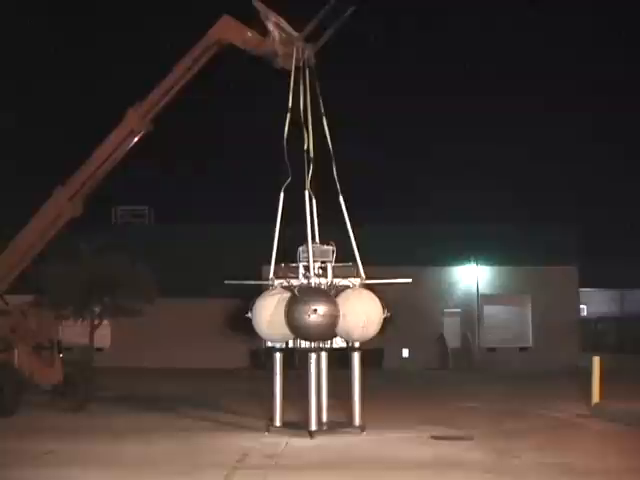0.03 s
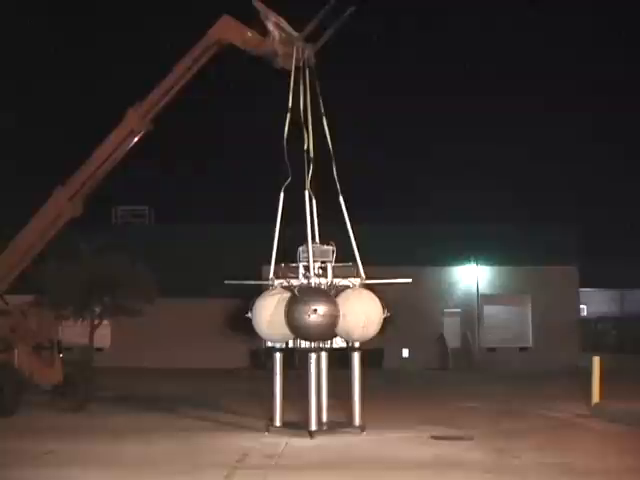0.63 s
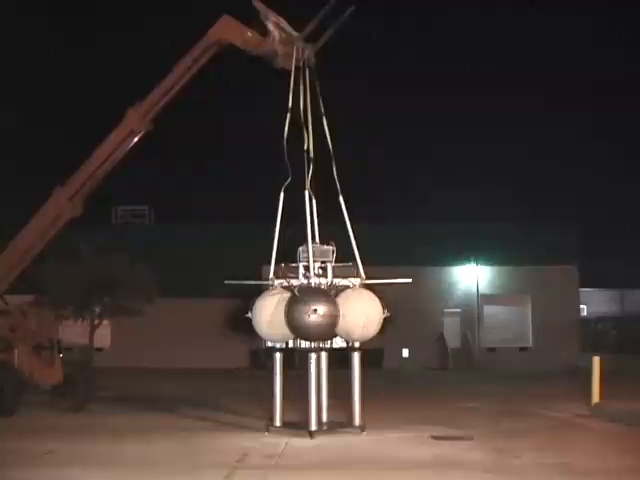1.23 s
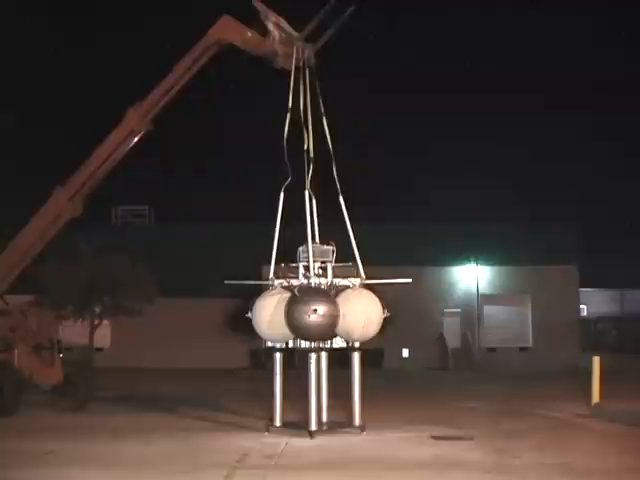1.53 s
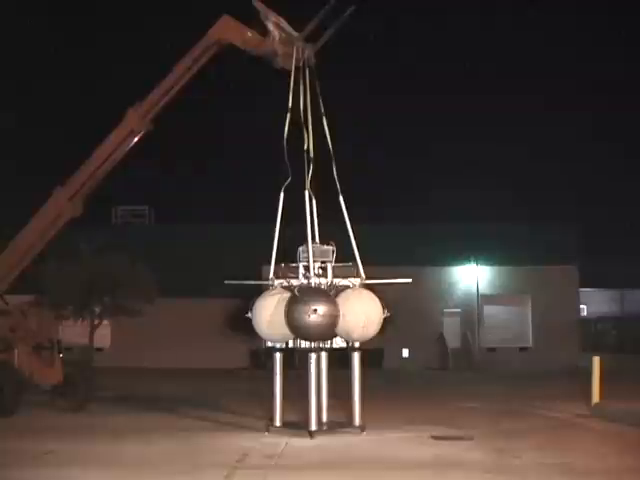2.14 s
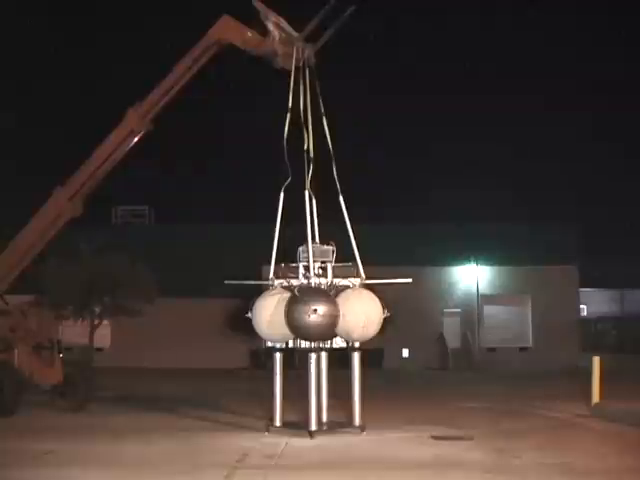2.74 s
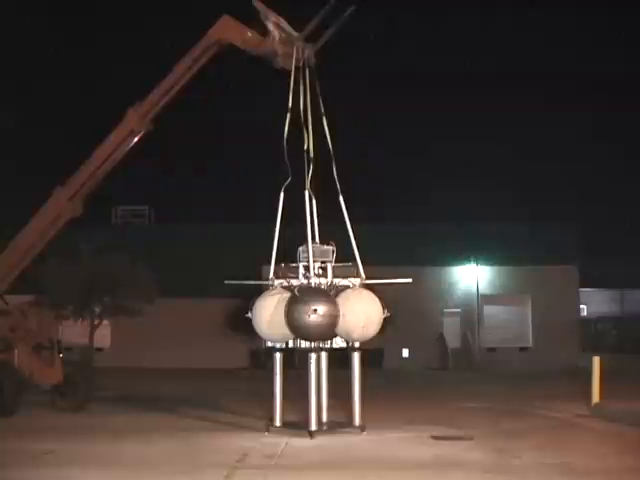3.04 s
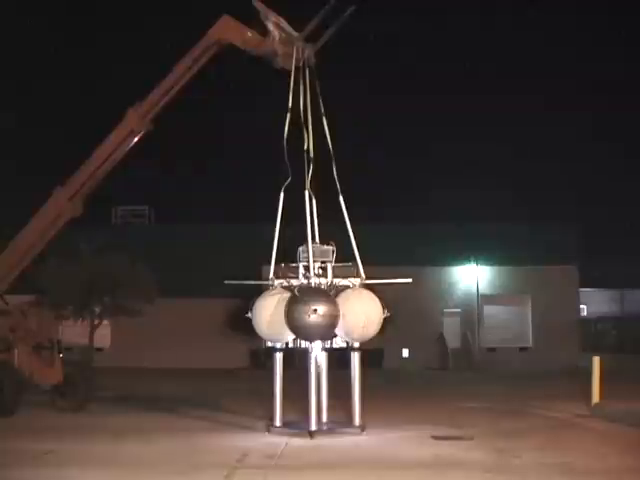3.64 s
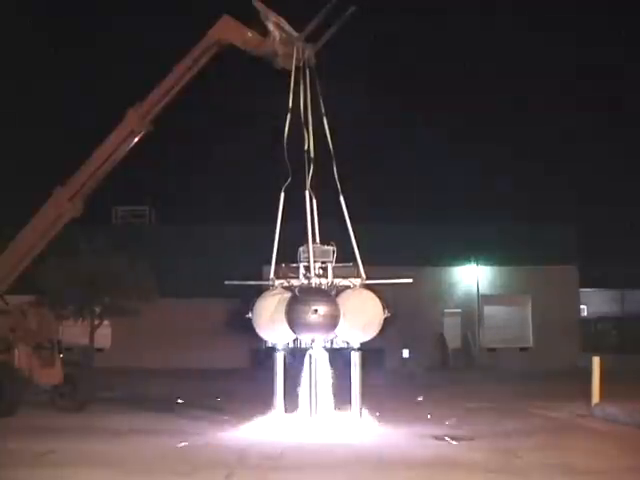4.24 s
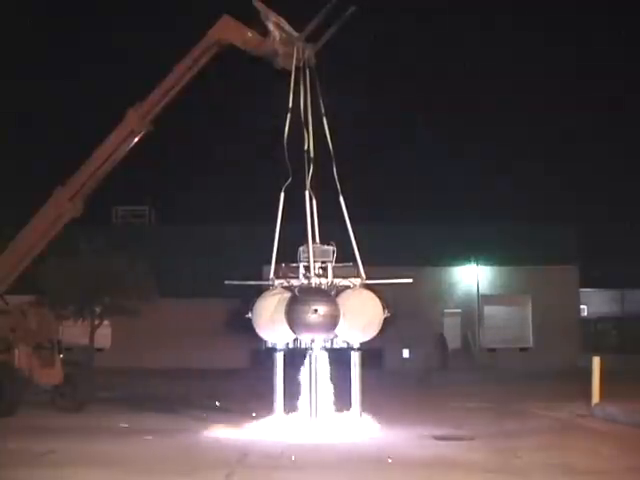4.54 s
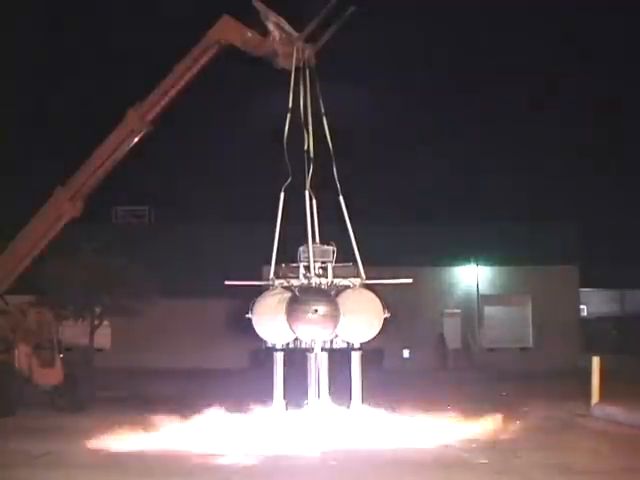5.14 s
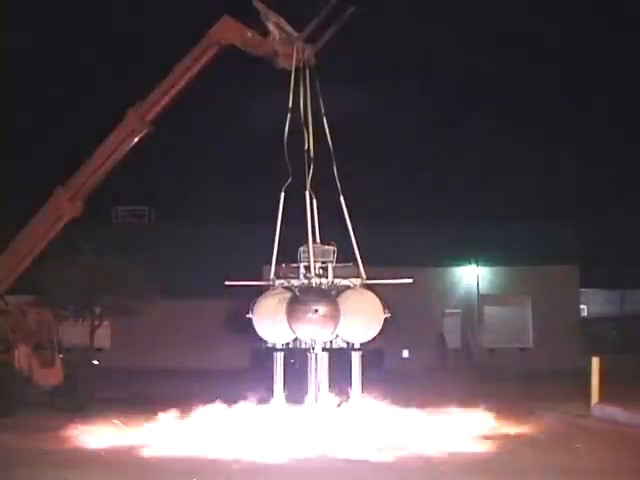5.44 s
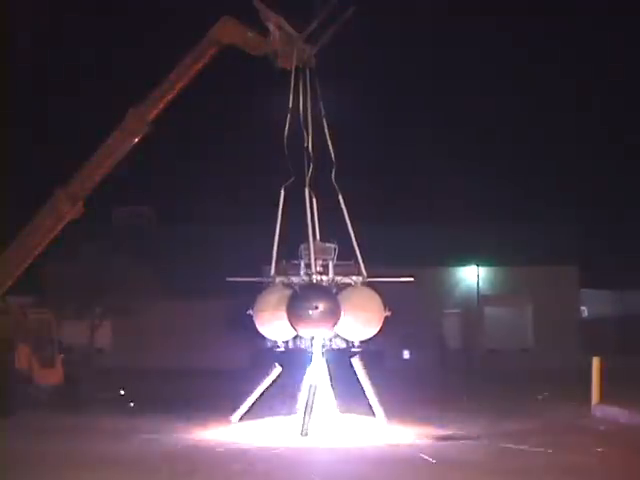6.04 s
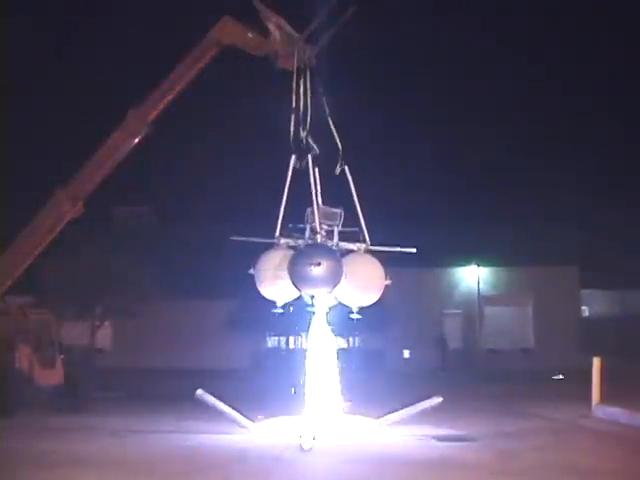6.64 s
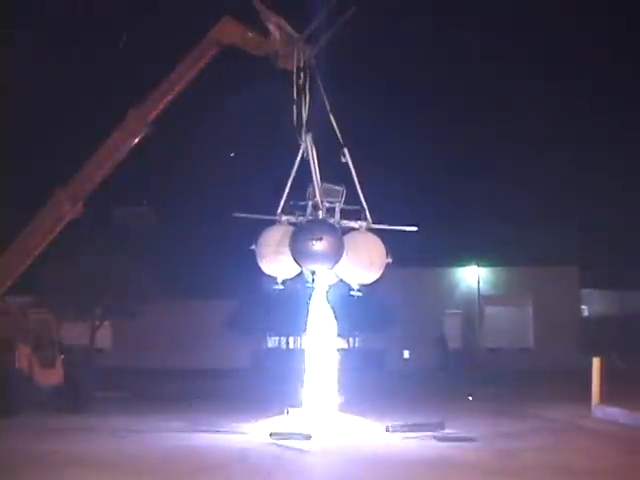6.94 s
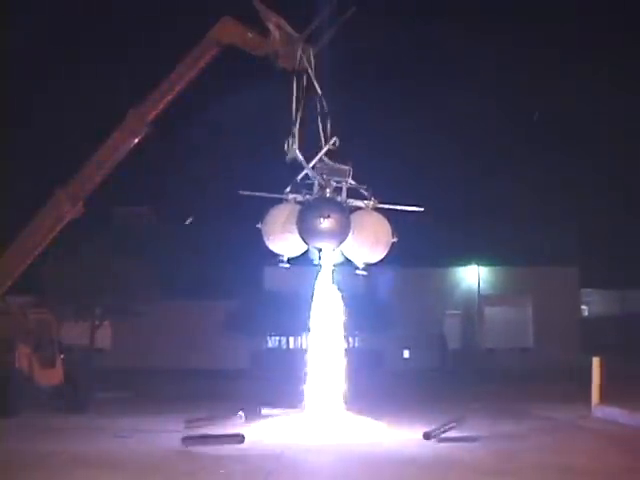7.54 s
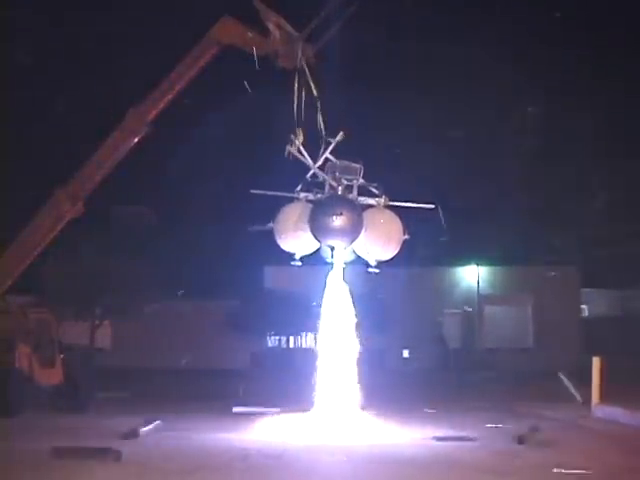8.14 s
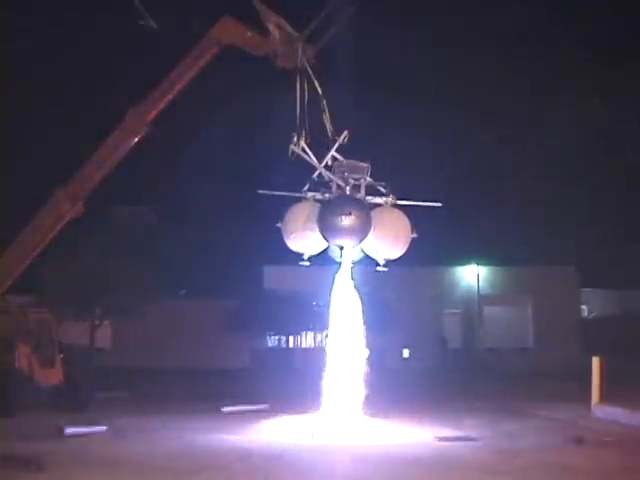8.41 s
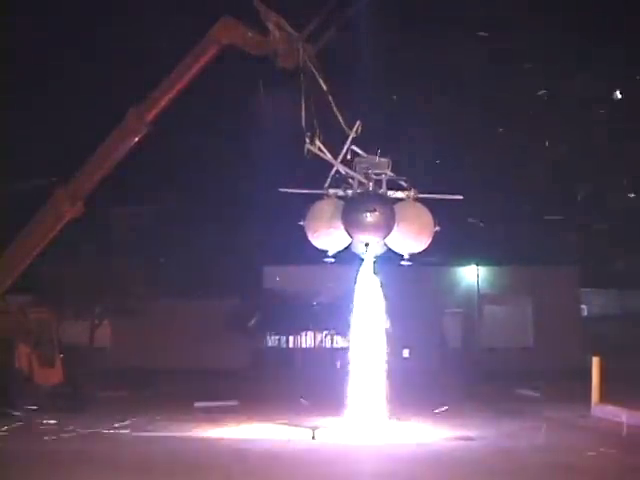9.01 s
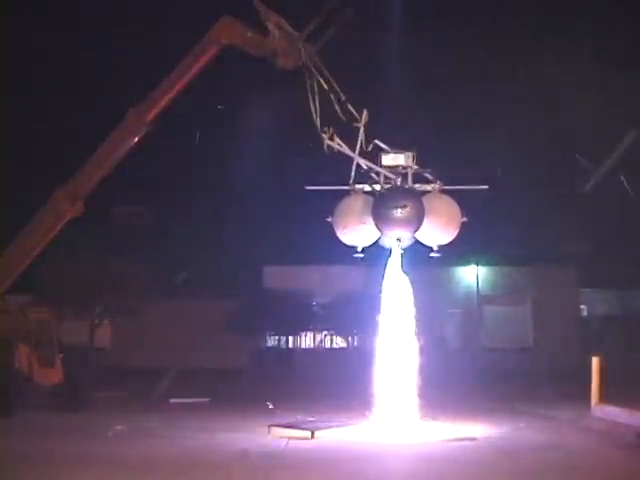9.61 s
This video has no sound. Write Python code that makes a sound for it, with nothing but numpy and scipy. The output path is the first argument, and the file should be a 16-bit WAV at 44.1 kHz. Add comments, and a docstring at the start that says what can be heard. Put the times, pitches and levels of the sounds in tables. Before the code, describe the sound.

A small rocket engine starts with a sharp blast and hiss, howls, pops, then roars at full thrust with brief screeches outdoors.

```python
"""First comes the faint hum of distant machinery in a paved yard at night. Then the igniter of a
tethered rocket lander cracks on and hisses, blowing gas through the hollow engine chamber. The chamber
lights with a howl that rises as its gas heats up. The flame pops, sputters, and opens into a full roar
of swirling exhaust as the craft lifts off, screeching where the jet hits the ground.
A wall sends the sound back, and the roar overloads the microphone."""
import sys
import numpy as np
from scipy import signal
from scipy.fft import rfft, irfft, next_fast_len
from scipy.io import wavfile
from scipy.ndimage import uniform_filter1d, map_coordinates

SR = 44100
rng = np.random.default_rng(int(sys.argv[2]) if len(sys.argv) > 2 else 0)


def dump_mix(stems):
    """Bounce the given channels to the path in sys.argv[1] as a 16-bit WAV at rate SR."""
    frames = np.atleast_2d(stems).T  # one column per channel
    limited = np.clip(frames, -1, 1)  # hard clip at full scale
    pcm = np.round(limited * 32767).astype(np.int16)
    wavfile.write(sys.argv[1], SR, pcm)


N = 435266

# the torch lights, the fuel valves open, the jet passes the speed of sound
TORCH_ON_S, VALVES_OPEN_S, SUPERSONIC_S = 2.697, 3.45, 3.96

# engine strength as it lights, sputters, almost dies and opens fully: t/s, level/dB
THRUST = [(3.45, -20), (3.62, -16), (3.9, -8), (4.03, -4), (4.3, -6), (4.6, -11.5), (4.74, -16.5),
          (4.9, -16.5), (4.99, -13.5), (5.3, -10.5), (5.59, -13), (5.685, -25), (5.75, -5.5), (5.98, -6),
          (6.25, -3.5), (8.6, -3), (8.95, -5.5), (9.4, -2.5)]
# the deep part of the roar, relative to the thrust: t/s, level/dB
PLUME_LEVEL = [(3.55, -11), (3.92, -5), (4.2, -14), (4.8, -7), (5.5, -23), (6.1, -13), (6.8, -6),
               (7.78, -4), (7.95, -12.5), (8.7, -7.5), (9.86, -8)]
# rises and dips of the highest treble: t/s, level/dB
TREBLE_LEVEL = [(4.1, 2.5), (4.7, 0), (4.98, 5), (5.25, 1), (5.88, -0.5), (6.05, 3), (6.55, -10.5),
                (6.8, 0.5), (7.55, -5.5), (8.02, 2.5), (8.2, -6), (8.5, 4.5), (8.85, -2), (9.2, 3.5),
                (9.55, -3), (9.75, 2.5)]
# flame rumble, strongest while burning fuel spreads over the ground: t/s, level/dB
RUMBLE_LEVEL = [(3.45, -27), (3.9, -29), (4.05, -18), (4.3, -21.5), (4.88, -28.5), (5.02, -17.5),
                (5.3, -22.5), (5.8, -27.5), (6.0, -33), (6.6, -24), (8.4, -26), (9.86, -22)]
# screeches of the jet on the ground: t/s, length/s, centre f/Hz, level/dB
SCREECHES = [(3.457, .05, 1300, -13), (3.656, 0.0906, 1200, -15.5), (3.99, .11, 1330, -12),
             (4.15, .07, 1600, -7), (4.252, .13, 1850, -12), (5.71, 0.048, 1150, -19),
             (6.299, .17, 1200, -11.5), (6.75, .4, 950, -15.5), (8.72, 0.068, 1800, -13),
             (9.77, 0.062, 1900, -8)]
# spurts of purge gas, which flushes the engine: t/s, length/s, level/dB
SPURTS = [(2.865, .17, -18), (3.34, .12, -19)]
# howls as the torch, then the main flame, lights: t/s, length/s, level/dB, rise/s, time to half hot/s
HOWLS = [(2.697, .12, -20, .004, 0.104), (3.729, 0.236, -8.5, 0.064, .15)]
# thumps and pops of uneven burning: t/s, level/dB, f/Hz, time to fade by 60 dB/s
THUMPS = [(2.697, -17, 100, 0.14), (3.455, -23, 60, .2), (4.774, -8, 114, 0.14), (4.99, -12, 173, 0.42),
          (5.235, -16, 153, .15), (5.711, -13, 120, .15), (5.745, 2.5, 1007, 0.13)]
# the echo weakens as the craft climbs: t/s, echo boost/dB, left minus right level/dB
ECHO_AND_PAN = [(2.7, 10.5, 0), (4.2, 9, -0.8), (5.0, 4, -2), (5.8, 3.5, -1.5), (6.5, 3.5, -0.5),
                (9.86, 3, -.3)]

# the tone colour (spectrum) of each noise: f/Hz, relative level/dB
ROAR_COLOUR = [(60, -36), (200, -20), (310, -16.5), (420, -11.5), (600, -6.5), (800, -7), (1200, 0.5),
               (1700, -0.5), (2250, 0.5), (2800, -6), (4000, -10), (8000, -33.5)]
PLUME_COLOUR = [(60, -19), (200, -8.5), (310, -1), (420, -2.5), (600, 0), (760, 2.5), (1000, 2.5),
                (1500, -14), (3000, -49)]
HISS_COLOUR = [(1500, -22), (2600, -3.5), (3600, -1.5), (5200, -2.5), (7000, -6), (9000, -14.5),
               (12000, -32), (16000, -38)]
FIZZ_COLOUR = [(4000, -18), (7000, 1.5), (9000, 3), (12000, 0.5), (16000, -4)]
RUMBLE_COLOUR = [(15, -8), (30, 1.5), (65, 1), (110, -2.5), (175, 4), (230, -6), (310, -4.5), (450, -6.5),
                 (900, -35)]
BLAST_COLOUR = [(60, -3), (200, -8), (380, -13), (620, 2.5), (800, -2.5), (1250, 4.5), (1750, -6),
                (2200, 1), (2800, -11), (4800, 1), (8000, -2.5), (16000, -28)]
TORCH_COLOUR = [(90, -21), (300, -9), (540, -9), (760, -9.5), (1020, -1), (1330, -6), (1640, -8.5),
                (1900, -0.5), (2700, -1), (3600, 0.5), (5200, -3), (7000, -4.5), (11000, -13.5),
                (16000, -22)]
PURGE_COLOUR = [(4000, -17), (7000, -2.5), (9000, 0.5), (10500, -1), (12500, 1.5), (14500, -5), (16000, -1)]
BOOM_COLOUR = [(30, -18), (85, -14), (125, -7.5), (190, 6), (240, -1.5), (320, -11.5), (390, -18),
               (700, -40)]
YARD_COLOUR = [(12, -48), (20, -18), (44, -3), (64, -1.5), (85, -15.5), (166, -2.5), (191, -8), (281, -13),
               (404, -15.5), (630, -17), (833, -20.5), (5230, -38.5), (6010, -37.5), (14200, -48),
               (15500, -35)]
FLAT_COLOUR = [(20, 0), (20000, 0)]

# ringing notes of the chamber, the machinery and the torch: f/Hz, width/Hz, relative level/dB
CHAMBER_NOTES = [(300, 64, -1.5), (1046, 86, -3.5), (1940, 70, -17), (3010, 60, -12), (3600, 220, -6),
                 (4440, 150, -7), (5620, 180, -9), (6850, 130, -16)]
HUM_NOTES = [(30, 14, -1), (57, 14, -3), (115, 12, -4), (167, 9, -5), (644, 16, -9), (5300, 270, -28)]
SPIT_NOTES = [(4650, 400, 0), (5400, 400, 0)]
# thin electronic whines: f/Hz, level/dB
WHINES = [(8242, -78), (15735, -73)]
# the wall's dull echo, before its boost: f/Hz, gain
WALL_GAIN = [(100, 0.12), (600, 0.19), (1600, 0.14), (3000, 0.1), (8000, .01)]
# how alike the left and right channels are: f/Hz, likeness from 0 to 1
JET_ALIKE = [(30, 0.85), (130, 0.99), (640, 1), (1400, 0.96), (3100, 0.82), (7500, 0.39), (12000, 0.47),
             (15000, 0.64)]
YARD_ALIKE = [(60, 0.74), (130, 1), (290, 0.7), (640, 0.67), (1410, 0.38), (3100, 0.27), (7000, 0.23),
              (15000, 0.48)]


def jet():
    """Swirls in the exhaust follow the thrust: small ones hiss at the nozzle, big ones roar beyond it."""
    thrust_db, plume_db = curves(THRUST) + curves(PLUME_LEVEL)
    treble_db, rumble_db = curves(TREBLE_LEVEL) + curves(RUMBLE_LEVEL)
    burning = envelope(VALVES_OPEN_S, np.inf, attack_s=.012, release_s=1)
    flutter = amp(0.59 * wobble(16) + 0.73 * wobble(90))
    roar = amp(thrust_db - 1.04) * rush(ROAR_COLOUR, JET_ALIKE, patchy_db=1.8)
    plume = amp(thrust_db + plume_db) * rush(PLUME_COLOUR, JET_ALIKE, patchy_db=1.6)
    hiss = amp(0.9 * thrust_db + .15 * treble_db - 3) * rush(HISS_COLOUR, JET_ALIKE, patchy_db=1.44)
    fizz = amp(thrust_db + treble_db - 11) * rush(FIZZ_COLOUR, JET_ALIKE, patchy_db=1.5)
    rumble = amp(rumble_db) * rush(RUMBLE_COLOUR, JET_ALIKE, patchy_db=1.9)
    # the treble is weak until the jet is supersonic, and when the nozzle nearly stalls (below -17 dB)
    starting_db = -7 * np.clip((SUPERSONIC_S - clock()) / .05 + 1, 0, 1)
    stalling_db = 0.69 * np.minimum(thrust_db + 17, 0)
    treble = amp(starting_db + stalling_db) * (hiss + fizz)
    return burning * (flutter * (roar + plume + treble) + rumble)


def screech():
    """The jet hitting the ground feeds back on itself in rough bursts, with a pitch that hops about."""
    centre_hz, = curves([(t, hz) for s, length, hz, db in SCREECHES for t in (s, s + length)])
    bursts = sum(amp(db) * envelope(s, length, attack_s=0.014, release_s=0.034)
                 for s, length, hz, db in SCREECHES)
    core = amp(2 * wobble(40)) * fuzzy_tone(centre_hz * (1 + .07 * wobble(28)), width_hz=80)
    tearing = fuzzy_tone(centre_hz, width_hz=560) + amp(-5) * core
    return bursts * amp(wobble(50)) * tearing


def igniter():
    """The torch starts with a blast, then hisses; purge gas sizzles and fades once the valves open."""
    age = clock() - TORCH_ON_S
    strike = lambda db, fade_s: amp(db - 60 * np.abs(age) / fade_s) * (age > 0)
    unsteady = lambda: amp(.6 * wobble(19) + .6 * wobble(83))
    blast = strike(db=-8, fade_s=1.0) * rush(BLAST_COLOUR, JET_ALIKE, patchy_db=4.0)
    spit = strike(db=-7, fade_s=.11) * ringing(SPIT_NOTES, JET_ALIKE)
    torch = amp(-16.5) * torch_flow() * unsteady() * rush(TORCH_COLOUR, JET_ALIKE, patchy_db=2.0)
    purge = amp(-17.5) * envelope(TORCH_ON_S, VALVES_OPEN_S - TORCH_ON_S, attack_s=.003, release_s=0.24)
    spurts = sum(amp(db) * envelope(s, length, attack_s=0.032, release_s=0.033)
                 for s, length, db in SPURTS)
    sizzle = (purge + spurts) * unsteady() * rush(PURGE_COLOUR, JET_ALIKE, patchy_db=2.5)
    return blast + spit + torch + sizzle


def torch_flow():
    """The torch's gas snaps on, holds, and fades as the main flame takes over."""
    return envelope(TORCH_ON_S, length_s=1.07, attack_s=.003, release_s=0.17)


def chamber():
    """The hollow chamber booms and rings as the torch fills it, and howls each time its gas heats up."""
    filling = np.clip((clock() - 2.8) / 0.22, 0, 1)
    falter_db = -8 * np.exp(-((clock() - 3.42) / 0.031) ** 2)  # a dip just before the valves open
    boom = amp(-21.5) * rush(BOOM_COLOUR, JET_ALIKE, patchy_db=1.5)
    ring = filling * amp(-18.5) * ringing(CHAMBER_NOTES, JET_ALIKE)
    return torch_flow() * amp(falter_db) * (boom + ring) + sum(howl(*row) for row in HOWLS)


def howl(start_s, length_s, db, attack_s, heating_s):
    """The chamber's lowest note swells into a rough growl and climbs as the gas heats."""
    cold_hz, hot_hz = 102.7, 189.7
    heat = (1 + np.tanh((clock() - start_s) / heating_s - 1)) / 2
    pitch_hz = cold_hz + (hot_hz - cold_hz) * heat
    size = amp(db) * envelope(start_s, length_s, attack_s, release_s=0.053)
    phase = 2 * np.pi * np.cumsum(pitch_hz * (1 + 0.042 * wobble(90))) / SR
    tone = size * amp(2.1 * wobble(70)) * np.sin(phase)
    # a strong wave steepens, so its octave grows with the square of its size
    return tone + amp(1.0) * size ** 2 * fuzzy_tone(2 * pitch_hz, width_hz=49)


def thumps():
    """Pockets of fuel burn all at once, each giving a short ringing push."""
    out = np.zeros(N)
    for s, db, hz, fade_s in THUMPS:
        age = np.maximum(clock() - s, 0)
        rise = 1 - np.exp(-age / 0.0067)
        out += amp(db - 60 * age / fade_s) * rise * np.sin(2 * np.pi * hz * age)
    return out


def wall_echo(x, delay_s=.0066):
    """A nearby hard wall sends back a dull copy of the sound a moment later."""
    return filtered(x, lambda hz: along(WALL_GAIN, hz) * np.exp(-2j * np.pi * hz * delay_s))


def machinery():
    """Distant machines make a soft rush and a blurred hum, with thin electronic whines on top."""
    whine = sum(amp(db + wobble(6)) * np.sqrt(2) * np.sin(2 * np.pi * hz * clock()) for hz, db in WHINES)
    soft_rush = amp(-46) * rush(YARD_COLOUR, YARD_ALIKE, patchy_db=0.5)
    hum = amp(-51.5) * ringing(HUM_NOTES, YARD_ALIKE)
    return soft_rush + hum + whine


def rush(colour, alike, patchy_db):
    """Stereo rushing noise of level 1, with random louder and softer patches in time and pitch."""
    grid = signal.stft(rng.standard_normal((2, N)), nperseg=1024)[2]  # channel, frequency, time
    patches = uniform_filter1d(rng.standard_normal(grid.shape[1:]), size=7, axis=0)
    patches = uniform_filter1d(patches, size=8, axis=1)
    pair = signal.istft(grid * amp(patchy_db * unit(patches)), nperseg=1024)[1][:, :N]
    # both ears share mid; a wider angle adds more side, which sets them apart
    angle = lambda hz: np.arccos(np.clip(along(alike, hz), -1, 1)) / 2
    shares = lambda hz: [np.cos(angle(hz)), np.sin(angle(hz))]
    mid, side = filtered(pair, lambda hz: amp(along(colour, hz)) * shares(hz))
    return unit(np.array([mid + side, mid - side]))


def ringing(notes, alike):
    """Stereo noise of level 1 that rings at the given notes."""
    peaks = lambda f: sum(amp(db) / (1 + ((f - hz) / width) ** 2) for hz, width, db in notes)
    return unit(filtered(rush(FLAT_COLOUR, alike, patchy_db=.5), peaks))


def fuzzy_tone(centre_hz, width_hz):
    """A gliding tone of level 1, blurred by slow noise."""
    tone = np.exp(2j * np.pi * np.cumsum(centre_hz) / SR)
    return unit(np.real(tone * (wobble(width_hz) + 1j * wobble(width_hz))))


def envelope(start_s, length_s, attack_s, release_s):
    """A gain that rises, holds until length_s after the start, then dies away."""
    age = clock() - start_s
    return np.clip(age / attack_s, 0, 1) * np.exp(-np.maximum(age - length_s, 0) / release_s)


def wobble(rate):
    """A smooth curve through `rate` random values a second."""
    return map_coordinates(rng.standard_normal(int(rate * N / SR) + 4), [clock() * rate], mode="mirror")


def filtered(x, response):
    """Scale and shift each frequency in x by response(hz)."""
    size = next_fast_len(N + SR // 4)
    return irfft(rfft(x, size) * response(np.fft.rfftfreq(size, 1 / SR)), size)[..., :N]


def curves(rows):
    """Join the dots of a time table: a list with one curve for each column after the time."""
    times, *columns = np.transpose(rows)
    return [np.interp(clock(), times, column) for column in columns]


def along(points, hz):
    """Read between the rows of a frequency table, on a log scale."""
    freqs, values = np.transpose(points)
    return np.interp(np.log(hz + 1), np.log(freqs + 1), values)


def clock():
    """The time of every sample, in seconds."""
    return np.arange(N) / SR


def amp(db):
    """Turn decibels into a gain."""
    return 10 ** (np.asarray(db) / 20)


def unit(x):
    """Scale to an average (rms) level of 1."""
    return x / np.sqrt(np.mean(x ** 2) + 1e-20)


def scene():
    """The rocket and its echo over the hum of the yard."""
    echo_db, pan_db = curves(ECHO_AND_PAN)
    rocket = igniter() + chamber() + screech() + jet()
    heard = rocket + amp(echo_db) * wall_echo(rocket) + thumps()
    return heard * amp([pan_db / 2, -pan_db / 2]) + machinery()


def record(dry):
    """The microphone squashes loud peaks and its opening rings; the recorder thins the bass and clips."""
    ceiling, hardness = .8, 3.4
    ring_hz, width_hz, bass_cut_hz, top_hz = 12300, 3200, 55, 15780
    ring = lambda f: 1 + amp(-1) * 1j * f * width_hz / (ring_hz ** 2 - f ** 2 + 1j * f * width_hz)
    squashed = dry / (1 + np.abs(dry / ceiling) ** hardness) ** (1 / hardness)
    coloured = filtered(squashed, lambda f: ring(f) * 1j * f / (bass_cut_hz + 1j * f))
    return filtered(np.clip(coloured, -1, 1), lambda hz: hz < top_hz)


dry = scene()
out = record(dry)
dump_mix(out)
```